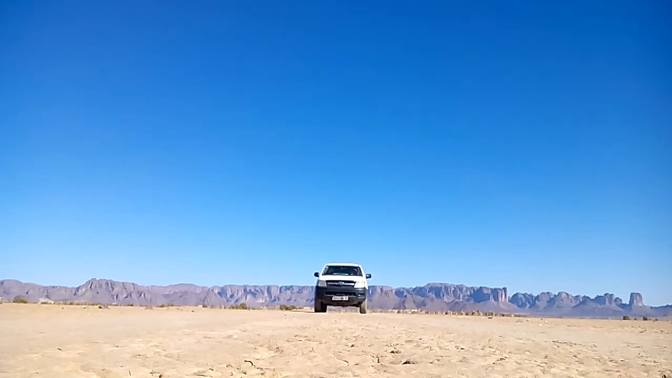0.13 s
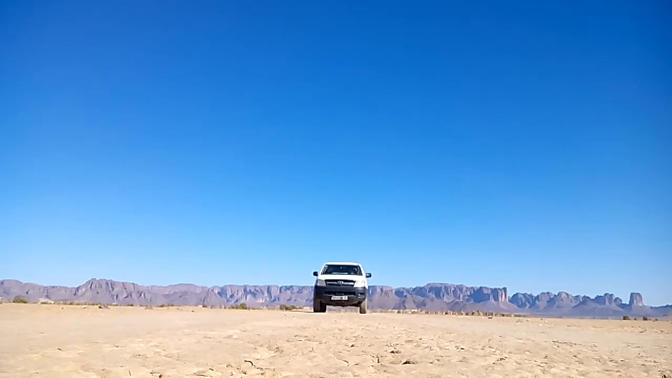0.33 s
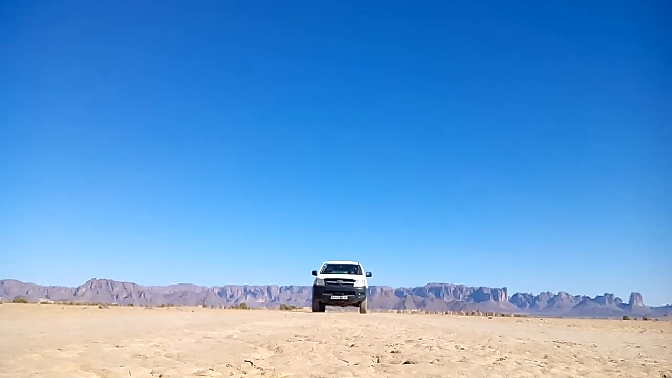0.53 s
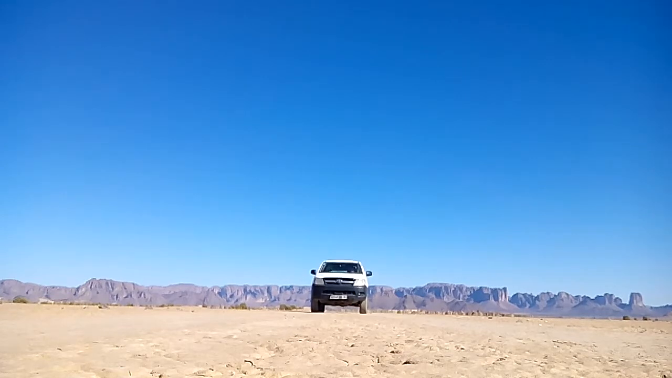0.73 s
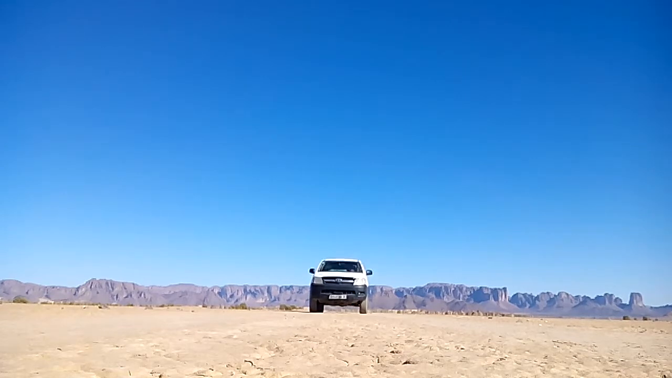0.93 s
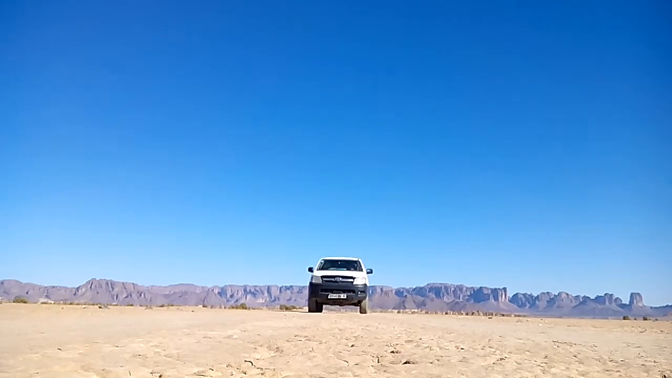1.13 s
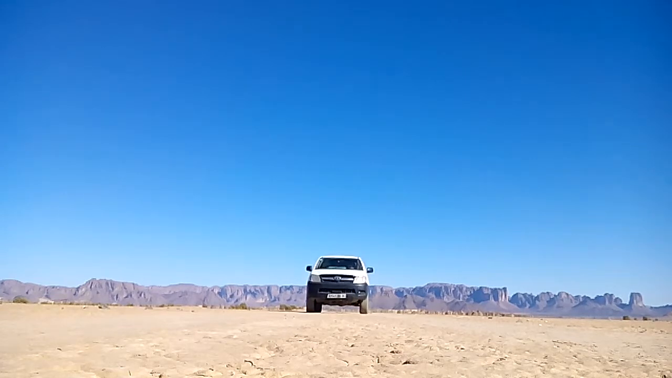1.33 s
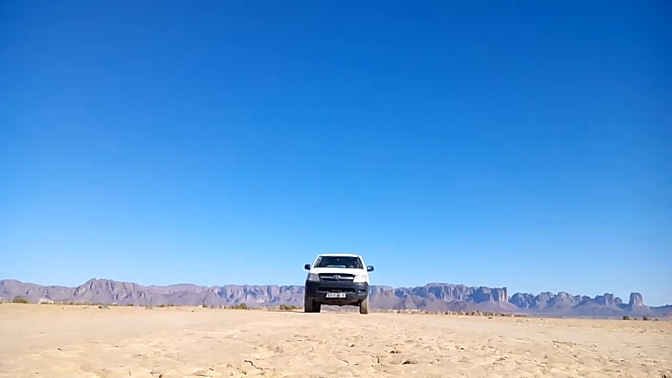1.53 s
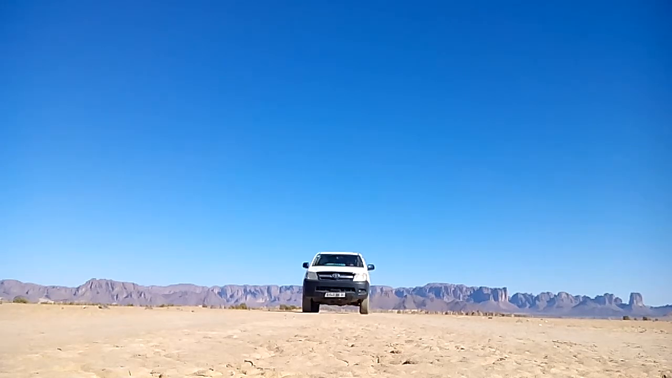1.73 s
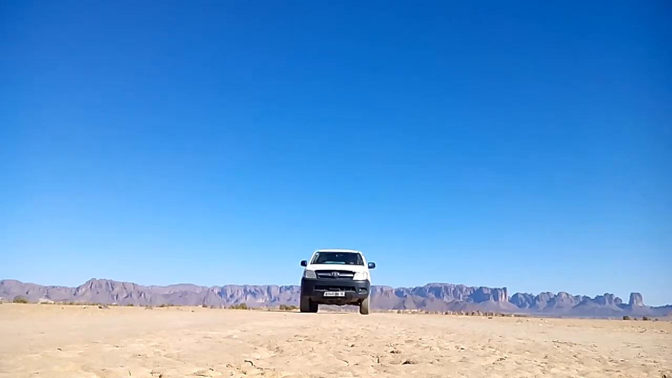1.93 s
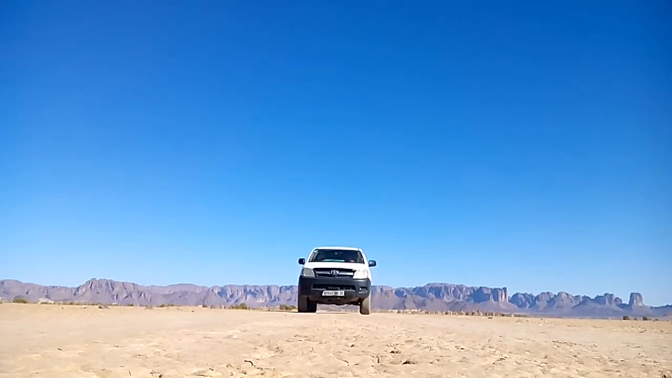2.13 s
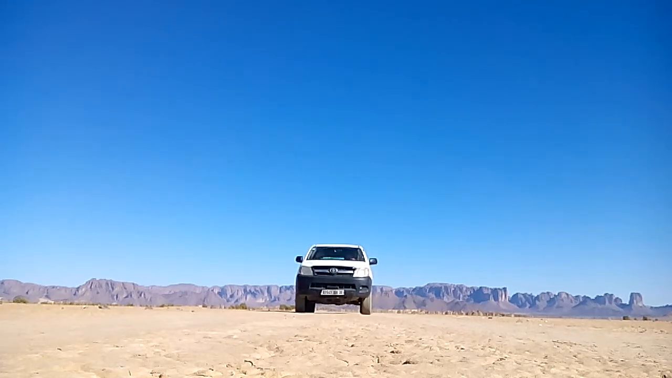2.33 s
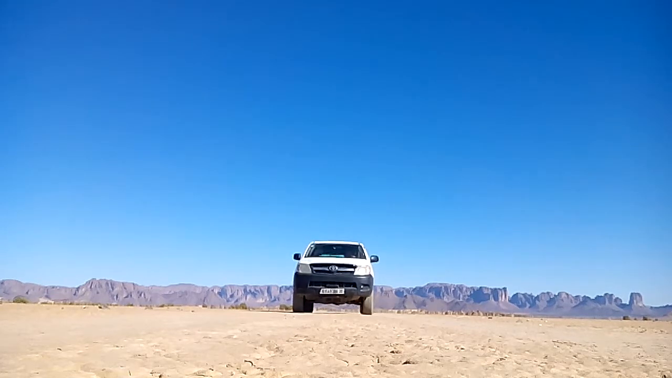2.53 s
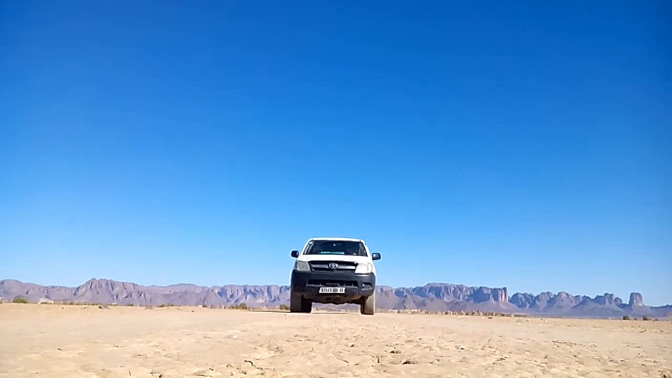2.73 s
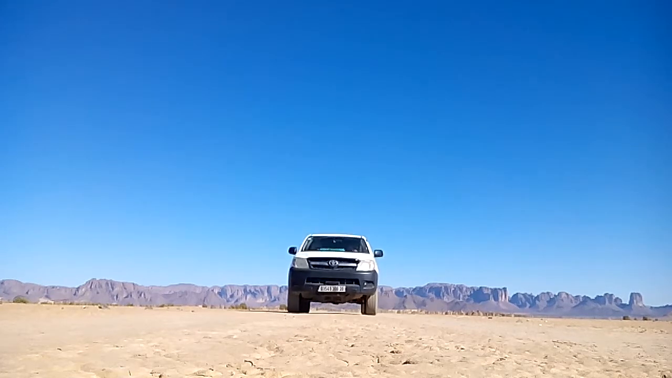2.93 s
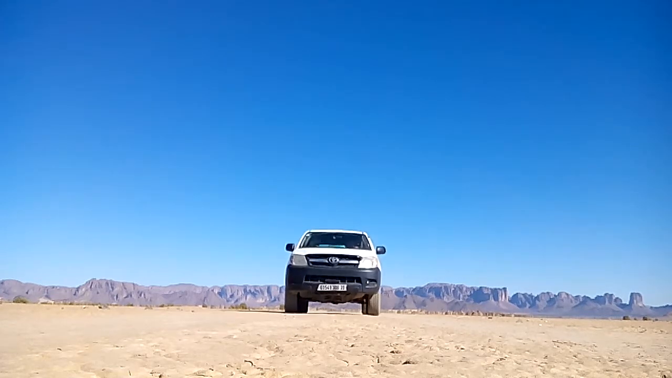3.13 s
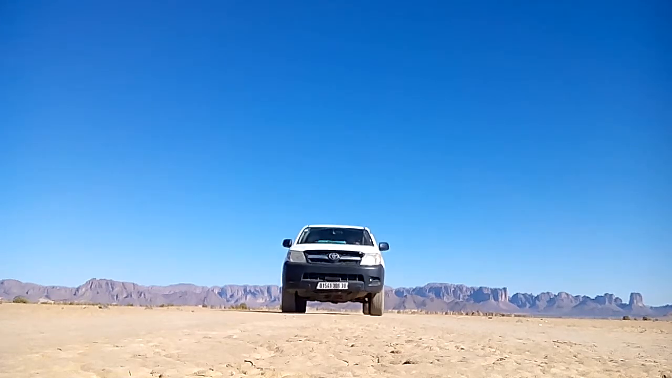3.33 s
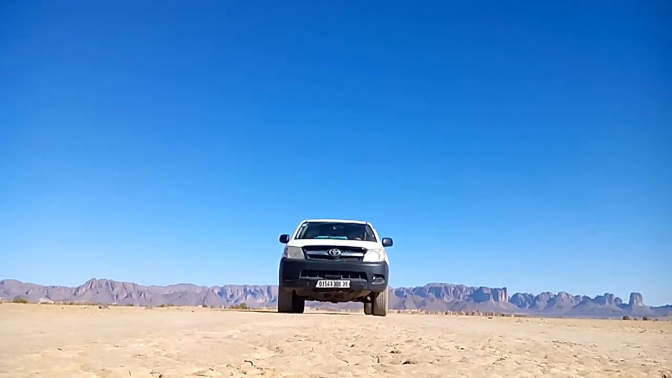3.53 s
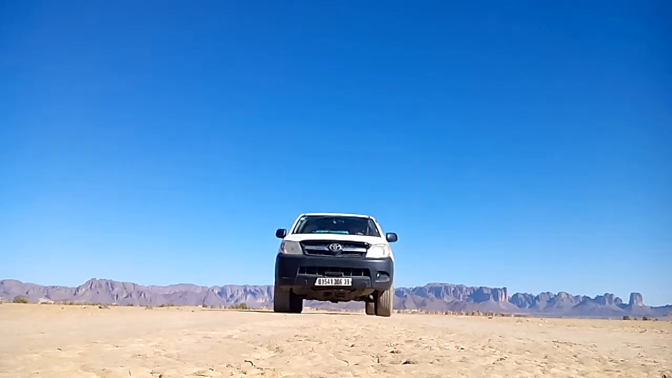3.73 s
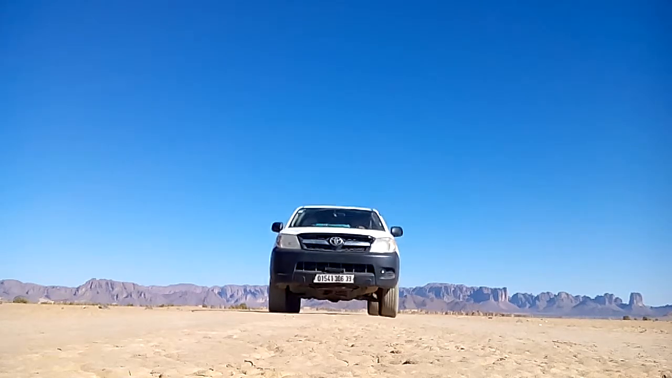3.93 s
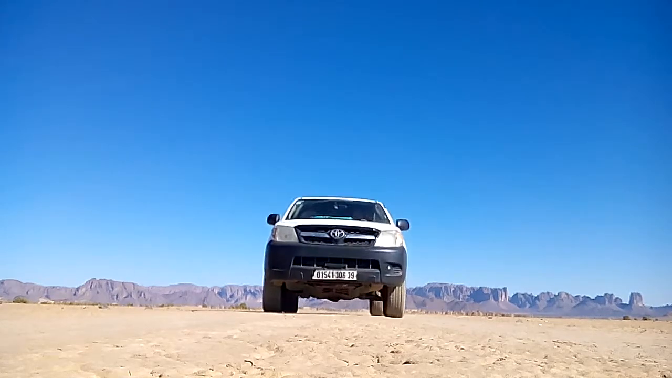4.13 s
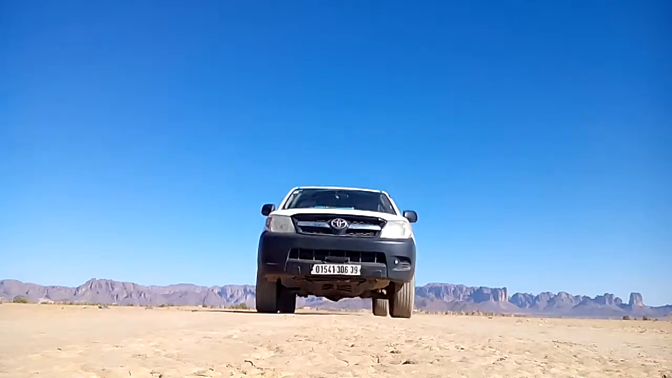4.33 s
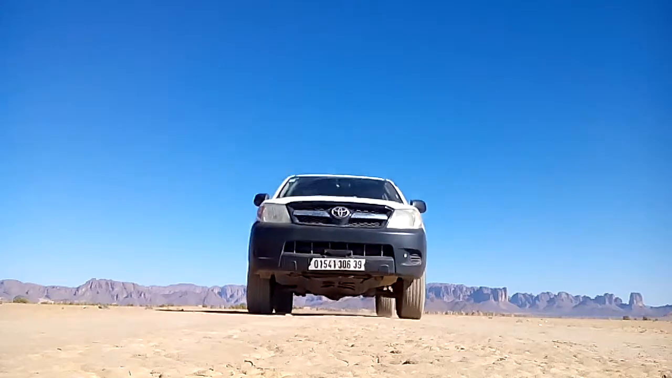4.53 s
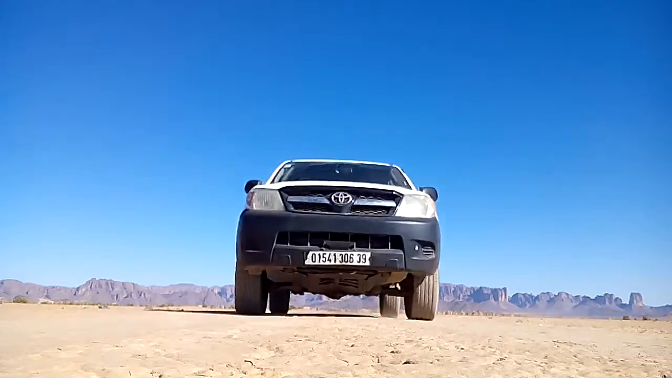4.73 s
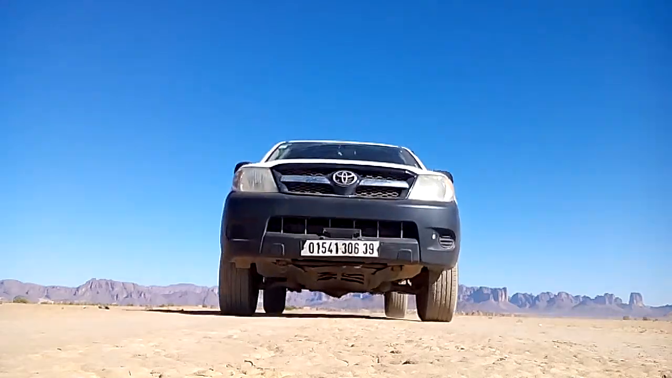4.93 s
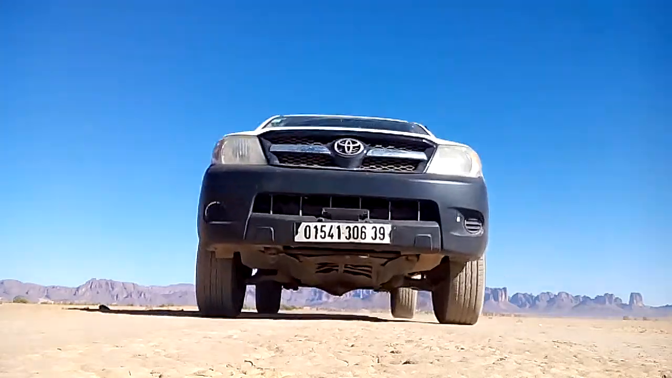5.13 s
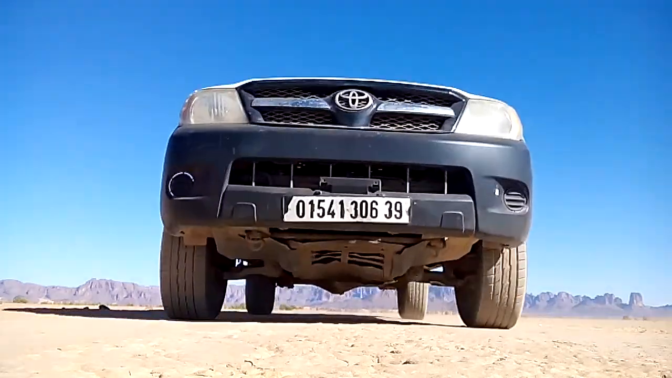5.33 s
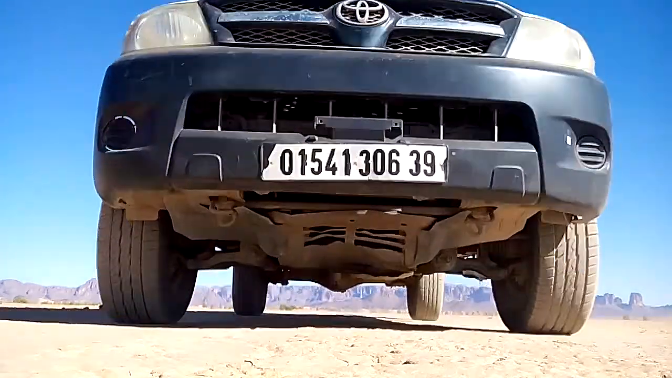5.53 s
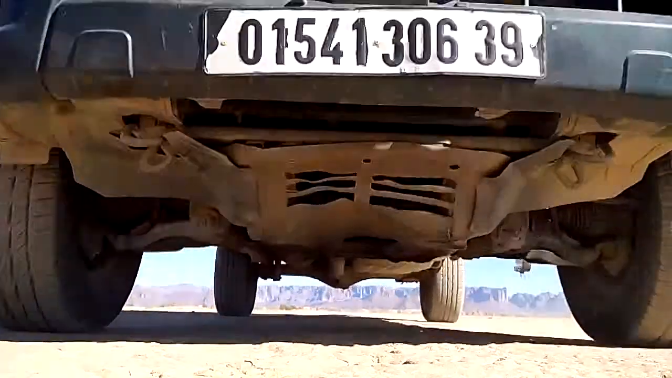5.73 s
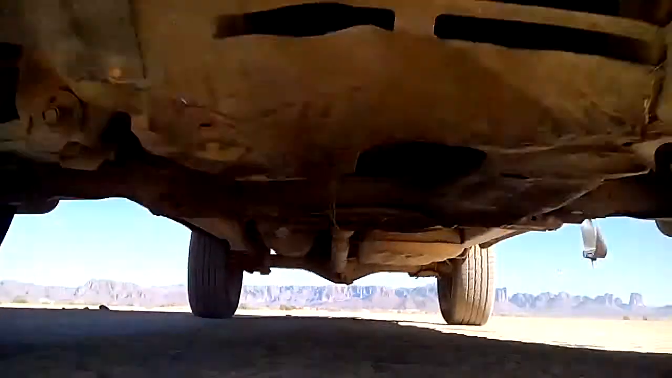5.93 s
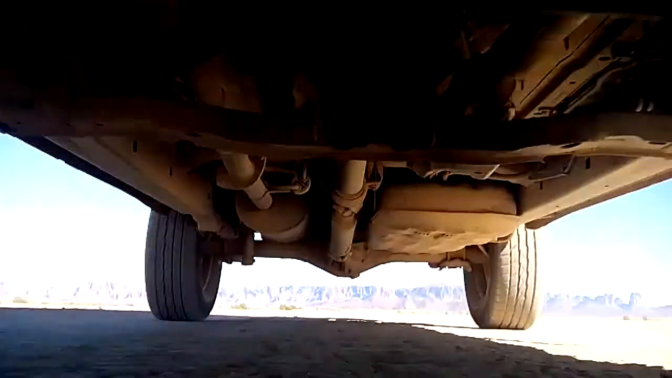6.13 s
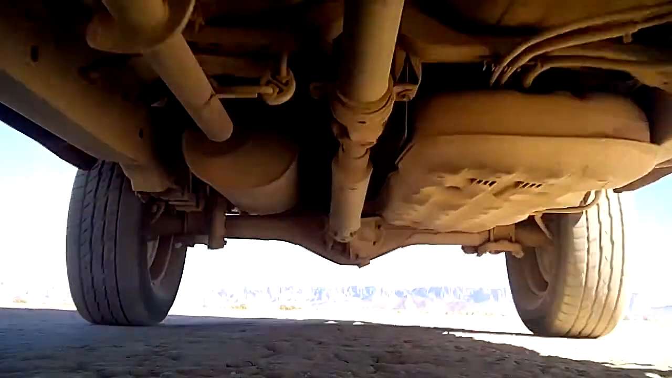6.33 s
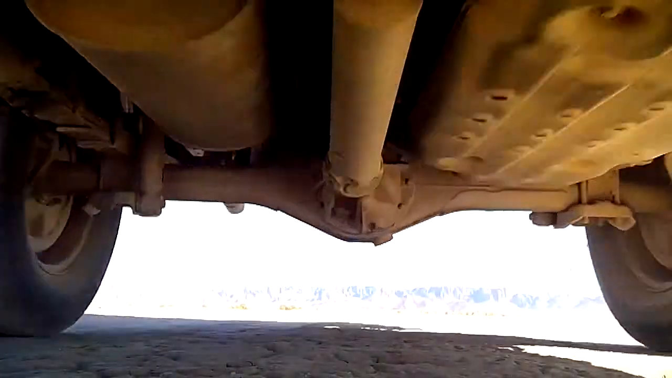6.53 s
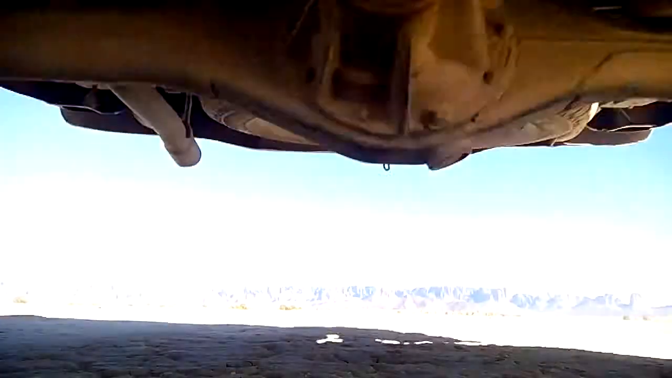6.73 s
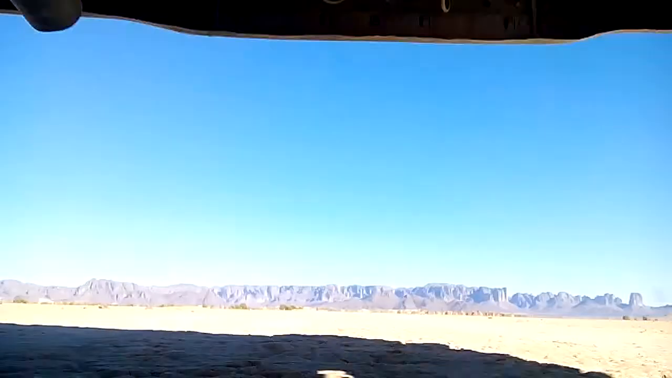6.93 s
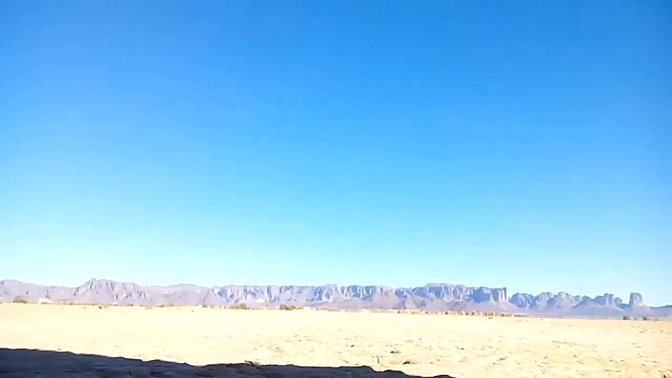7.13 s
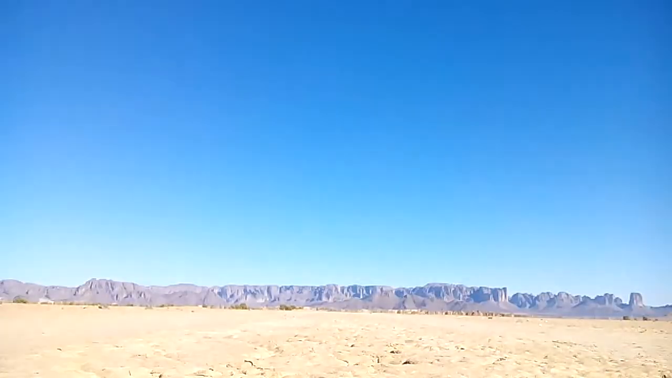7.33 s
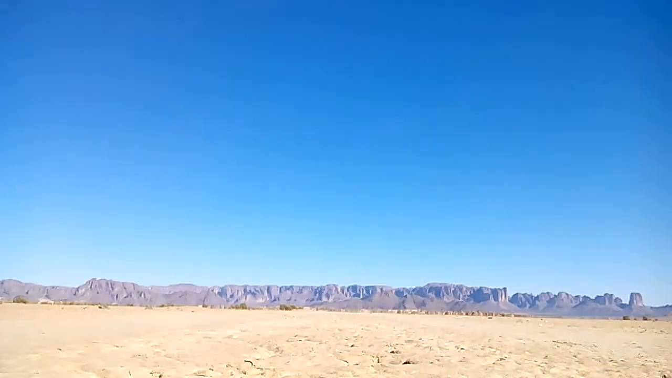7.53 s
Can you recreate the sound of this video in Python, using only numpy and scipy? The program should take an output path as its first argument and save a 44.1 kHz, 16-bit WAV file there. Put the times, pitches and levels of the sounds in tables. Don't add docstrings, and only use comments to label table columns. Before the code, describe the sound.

On open flat desert, a ground-level microphone catches soft breeze buffeting and a distant diesel pickup revving up. Its rattling, knocking engine and tyre roar grow steadily, then surge sharply as it drives right overhead with bright clatter, low air rumble and a hollow boom beneath the floor. Immediately afterward the revs fall and the sound fades.

```python
import sys
import numpy as np
from scipy import signal
from scipy.fft import rfft, irfft
from scipy.io import wavfile
from scipy.ndimage import uniform_filter1d

SR = 44100
rng = np.random.default_rng(int(sys.argv[2]) if len(sys.argv) > 2 else 0)


def generate_wav(signal):
    frames = np.transpose(np.atleast_2d(signal))
    scaled = np.clip(frames, -1, 1) * 32767
    pcm = np.round(scaled).astype(np.int16)
    wavfile.write(sys.argv[1], SR, pcm)


def gain_from_decibels(decibels):
    exponent = np.asarray(decibels, float) / 20
    return 10 ** exponent


N = 334278

# time in seconds, firings per second in Hz.
ENGINE_SPEED = [(0.0, 28.9), (0.65, 38.58), (1.0, 43.84), (1.2, 46.56), (1.7, 51.77), (2.09, 54.6),
                (2.55, 57.35), (3.1, 59.05), (4.18, 63), (4.85, 63.92), (5.11, 64.55), (5.47, 65.51),
                (6.23, 66.94), (6.4, 64.48), (6.61, 60.46), (7.2, 44.32), (7.35, 38.9), (7.58, 33.8)]
# frequency in Hz, level in dB.
BLOCK_MODES = [(160, -10), (225, -3), (290, -5), (340, -2), (390, 2), (450, -8), (500, 4.5), (530, 2),
               (560, -5), (610, 0), (670, 0), (770, -4), (900, -8), (1130, -9)]
CYLINDER_LEVELS = [0, -1.2, -.4, -1]
# frequency in Hz, level in dB per Hz.
ROAR_SPECTRUM = [(20, -26), (48, -32), (95, 2), (200, 22), (400, 8.5), (600, 16), (900, 7), (1300, -34),
                 (4000, -70)]
# frequency in Hz, level in dB per Hz.
RATTLE_FAR = [(700, -3), (1070, 6), (1350, -0.5), (1750, 1), (2250, 1), (3000, -2.5), (3300, -9),
              (4350, -13.5), (4850, -8), (5750, -5.5), (7000, -17.5), (8900, -28.5), (9900, -37),
              (15500, -43)]
# frequency in Hz, level in dB per Hz.
RATTLE_UNDER = [(600, 2.5), (900, 6.5), (1500, 4), (2200, 0), (3400, -1.5), (4100, -5), (5000, -3.5),
                (5900, -7.5), (7000, -16.5), (10000, -26.5), (15500, -42)]
# frequency in Hz, level in dB per Hz.
GUST_SPECTRUM = [(20, 5), (45, -20), (75, 12.5), (150, 14.5), (250, 9), (380, 0), (600, -22), (2000, -80)]
# time in seconds, peak level in dB, frequency in Hz.
EDDIES = [(0.025, -51, 185), (0.082, -43, 139), (0.25, -34, 159), (0.307, -39, 139), (0.381, -38.5, 195),
          (0.49, -34.5, 114), (0.599, -38, 151), (0.663, -35, 161), (0.914, -39, 107), (1.041, -35, 120),
          (1.185, -50, 263), (1.292, -36, 187), (1.417, -32, 115), (1.51, -37, 135), (1.598, -49, 171),
          (1.677, -30, 230), (1.761, -23, 208), (1.998, -31.5, 276), (2.105, -38, 157.2),
          (2.245, -47, 109.1), (2.337, -42, 173.2), (2.379, -32, 152), (2.58, -44, 140),
          (2.674, -33.5, 201), (2.802, -29.5, 130), (2.949, -36, 130), (3.173, -51, 185.3),
          (3.27, -36, 105), (3.433, -46, 142.8), (3.485, -35, 120.6)]
# level in dB of the whole, quarter, half, three-quarter orders.
UNEVEN_ORDERS = [0, -15, -2, -15]
# frequency in Hz, level in dB per Hz.
GAP_SPECTRUM = [(110, -29), (190, -9), (260, -4.5), (350, 2), (430, 4), (600, -40), (3000, -88)]
# time in seconds, rise in dB, half width in seconds.
GAP_SWELL = (6.56, 5.0, .09)
EXHAUST_ORDERS = [-33, -23, -24.5, -20]
EXHAUST_BEHIND = [-1, -2, -5.5, -9.5]
# time in seconds, change in dB, half width in seconds.
FLOOR_WAVES = [
    [(6.62, 4, 0.11), (6.95, -6, 0.13), (7.35, -16, 0.17)],
    [(6.22, 4, 0.15), (6.38, 4, 0.026), (6.62, 3.5, .07), (6.95, 1, .08), (7.12, -2, 0.082),
     (7.27, 5, 0.023), (7.46, 7, .08)],
    [(6.26, -24, 0.1), (6.42, -13, 0.055), (6.62, -15, 0.059), (7.08, 6.5, .05), (7.2, 7, 0.034),
     (7.44, 15, 0.16)],
    [(6.2, -18, 0.083), (6.35, 5, 0.064), (6.8, 7, .06), (7.05, 11, 0.07), (7.32, 12, 0.063),
     (7.48, 14, .06)],
]
# time in seconds, peak level in dB, seconds to fall (sign has no effect).
GEAR_WHINES = [
    (1.45, -55, 0.4),
    (4.7, -51, -0.7),
]

RATTLE_1M_DB = -24.0
TIME_S = np.arange(N) / SR


def rms_one(x):
    return x / np.sqrt(np.mean(x ** 2) + 1e-20)


def in_time(rows):
    s, *columns = np.transpose(rows)
    return [np.interp(TIME_S, s, column) for column in columns]


def at_hz(points, hz):
    table_hz, table_db = np.array(points).T
    return np.interp(np.log(hz), np.log(table_hz), table_db)


def step(x, at, blur):
    return 0.5 + 0.5 * np.tanh((x - at) / blur)


def bump(at_s, half_s):
    return np.exp(-((TIME_S - at_s) / half_s) ** 2)


def drift(rate):
    r = np.exp(-80 * np.pi * rate / SR)
    slow = signal.lfilter([1], [1, -2 * r, r * r], rng.standard_normal(N // 40 + 2002))[2000:]
    return np.interp(np.arange(N) / 40, np.arange(len(slow)), rms_one(slow))


def coloured(spectrum):
    hz = np.maximum(np.arange(N // 2 + 1) * SR / N, 1)
    white = rfft(rng.standard_normal(N))
    return rms_one(irfft(white * gain_from_decibels(at_hz(spectrum, hz)), N))


def breeze():
    calm_db, freshen_db_per_s = -52, 1.24
    gust_db, gust_lag_s, gust_half_s = -14.5, 0.02, 0.036
    gusts = gain_from_decibels(calm_db + freshen_db_per_s * TIME_S)
    for s, db, hz in EDDIES:
        gusts += gain_from_decibels(db + gust_db) * bump(s + gust_lag_s, gust_half_s)
    out = gusts * gain_from_decibels(2.8 * drift(28.5)) * coloured(GUST_SPECTRUM)
    age = np.arange(-600, 600) / SR
    for s, db, hz in EDDIES:
        eddy = np.sin(2 * np.pi * hz * age) + 0.44 * np.sin(2 * np.pi * 1.81 * hz * age)
        fade = np.exp(-(age * hz / 3.5) ** 2) * np.hanning(len(age))
        out[round(s * SR):][:len(age)] += gain_from_decibels(db - 3.5) * eddy * fade
    return out


def wake(near_db):
    low = signal.butter(6, 34, fs=SR, output="sos")
    rumble = rms_one(signal.sosfilt(low, rng.standard_normal(N)))
    drag_db = -39 - 18 * np.maximum(TIME_S - 6.5, 0)
    drag = step(TIME_S, 6, 0.025) * gain_from_decibels(drag_db)
    s, swell_db, half_s = GAP_SWELL
    boom_db = RATTLE_1M_DB + near_db - 5.5 + swell_db * bump(s, half_s) + 4.4 * drift(19)
    boom = step(TIME_S, 6.2, 0.35) * gain_from_decibels(boom_db) * coloured(GAP_SPECTRUM)
    return drag * rumble + boom


def roar():
    noise = gain_from_decibels(0.15 * drift(25.0)) * coloured(ROAR_SPECTRUM)
    middle = signal.sosfilt(signal.butter(3, [420, 900], "band", fs=SR, output="sos"), noise)
    return noise / np.std(middle)


def motion(rate_hz):
    metres_per_firing, engine_above_s = 0.074, 6.329
    engine_half_m, engine_height_m = 0.24, 0.8
    tail_behind_m, tail_height_m, tail_db = 2.38, 1.18, -7.5
    sand_db_per_m, revs_power = 0.29, 1.09
    shadow_m, shadow_db_per_m = 5.2, 5.5
    road = metres_per_firing * np.cumsum(np.maximum.accumulate(rate_hz)) / SR
    past_m = road - road[round(engine_above_s * SR)]
    away_m = np.abs(past_m)
    front = 1 / (np.maximum(away_m - engine_half_m, 0) ** 2 + engine_height_m ** 2)
    tail = gain_from_decibels(tail_db) ** 2 * step(past_m, 0, 0.86) / ((past_m - tail_behind_m) ** 2 + tail_height_m ** 2)
    shadow_db = shadow_db_per_m * np.maximum(past_m - shadow_m, 0)
    revs_db = 20 * revs_power * np.log10(rate_hz / rate_hz.max())
    return past_m, 10 * np.log10(front + tail) - sand_db_per_m * away_m + revs_db - shadow_db


def clatter(firing, rate_hz, past_m, under, patchy_db):
    age = firing % 1 / rate_hz / 0.004
    depth_db = np.minimum(190 / rate_hz, 4.5) * (1 - 0.6 * under)
    cylinder_db = np.take(CYLINDER_LEVELS, firing.astype(int) % 4)
    burst = gain_from_decibels(depth_db * age * np.exp(1 - age) + cylinder_db)
    burst /= np.sqrt(uniform_filter1d(burst ** 2, size=8000))
    hz, s, cells = signal.stft(burst * rng.standard_normal(N), SR, nperseg=512)

    loss_db = np.maximum(0.4 * past_m, 0.34 * past_m) + 0.1351 * past_m ** 2
    loss_db = np.interp(s, TIME_S, loss_db)
    under = np.interp(s, TIME_S, under)
    air_db = -np.minimum(loss_db, 29) * (hz[:, None] / 10000) ** 3.56
    far_db = at_hz(RATTLE_FAR, hz + 1)[:, None]
    under_db = at_hz(RATTLE_UNDER, hz + 1)[:, None]

    panels = uniform_filter1d(rng.standard_normal(cells.shape), size=2, axis=0)
    panels = rms_one(uniform_filter1d(panels, size=12, axis=1))
    gain = gain_from_decibels(far_db + under * (under_db - far_db) + air_db + patchy_db * panels)
    rattle = signal.istft(cells * gain, SR, nperseg=512)[1][:N]
    rattle = signal.sosfilt(signal.butter(4, 100, "high", fs=SR, output="sos"), rattle)
    flutter = gain_from_decibels(0.76 * drift(16.0))
    return rattle * flutter * (rate_hz / rate_hz.max()) ** -0.32


def knock(firing, rate_hz):
    tones, power = 0, 0
    slow_firing, slow_rate_hz = firing[::8], rate_hz[::8]
    for k in range(9, 72):
        if k in (12, 16):
            continue
        mode_db = at_hz(BLOCK_MODES, k / 4 * slow_rate_hz)
        height = gain_from_decibels(mode_db + UNEVEN_ORDERS[k % 4] + 2.2 * drift(1.5)[::8])
        tones = tones + height * np.cos(np.pi * k / 2 * slow_firing + 2 * np.pi * rng.random())
        power = power + height ** 2 / 2
    return signal.resample_poly(1.2 * tones / np.sqrt(power), 8, 1)[:N]


def engine_body(firing, rate_hz, past_m, under):
    far, pulling, overhead = 0.3, 0.87, 0.28
    pull = far + (pulling - far) * step(TIME_S, 1.9, 0.18)
    tonal = pull + (overhead - pull) * step(past_m, -0.15, 0.52)
    tonal = np.clip(tonal, 0.02, 0.98)
    body = np.sqrt(tonal) * knock(firing, rate_hz) + np.sqrt(1 - tonal) * roar()
    load_db = 3.0 * bump(2.63, 0.91)
    return gain_from_decibels(-19 - 3 * under + load_db) * body


def exhaust(firing, past_m, near_db):
    behind, tones = step(past_m, 0.35, 0.35), 0
    for k in range(4):
        waves_db = sum(db * bump(s, half_s) for s, db, half_s in FLOOR_WAVES[k])
        db = EXHAUST_ORDERS[k] + near_db + EXHAUST_BEHIND[k] * behind + waves_db
        wave = np.cos(2 * np.pi * (k + 1) * firing + np.pi + 0.6 * k)
        tones = tones + gain_from_decibels(db + 0.32 * drift(1.6)) * wave
    swell = sum(gain_from_decibels(db - 14 * ((TIME_S - s) / fall_s) ** 4) for s, db, fall_s in GEAR_WHINES)
    whine_order = 10.5
    whine = swell * gain_from_decibels(2.0 * drift(12.0)) * np.sin(2 * np.pi * whine_order * firing)
    return np.sqrt(2) * (tones + whine)


def scene():
    rate_hz, = in_time(ENGINE_SPEED)
    firing = np.cumsum(rate_hz) / SR
    past_m, near_db = motion(rate_hz)
    under = step(past_m, -1.43, 0.72)
    rattle = gain_from_decibels(RATTLE_1M_DB + 10.5) * clatter(firing, rate_hz, past_m, under, patchy_db=1.5)
    engine = gain_from_decibels(near_db) * (engine_body(firing, rate_hz, past_m, under) + rattle)
    mix = breeze() + wake(near_db) + engine + exhaust(firing, past_m, near_db)
    return mix[None]


def band_limit(x):
    return signal.sosfilt(signal.butter(12, 15540, fs=SR, output="sos"), x)


def record(dry):
    hiss = gain_from_decibels(-82.5) * rng.standard_normal(dry.shape)
    top = signal.ellip(12, 0.3, 50, 15520, fs=SR, output="sos")
    return band_limit(signal.sosfilt(top, dry + hiss))


dry = scene()
out = record(dry)
generate_wav(out)
```